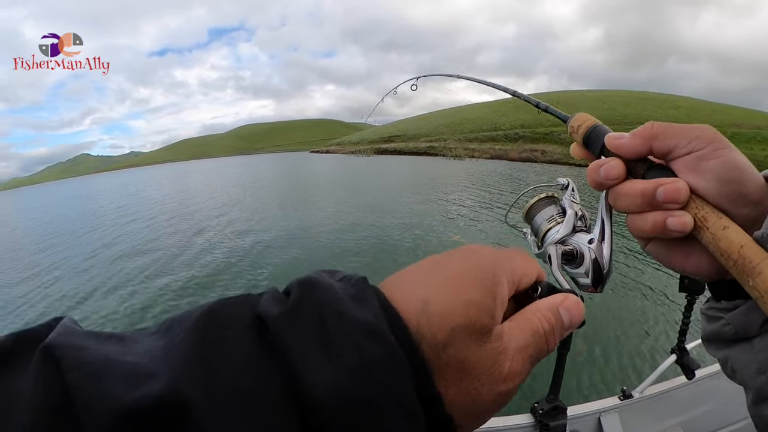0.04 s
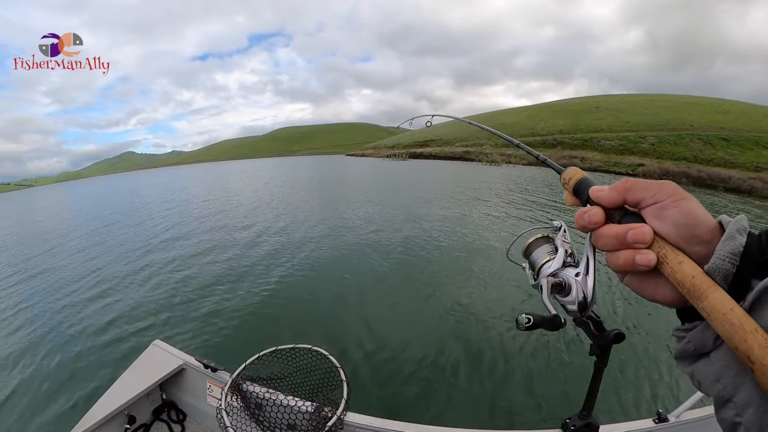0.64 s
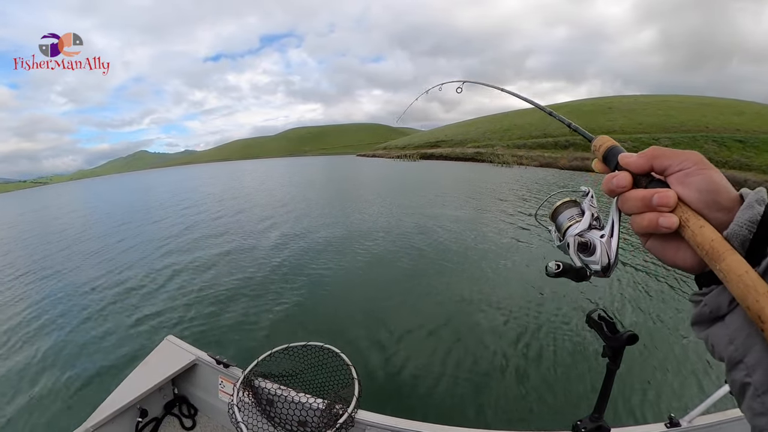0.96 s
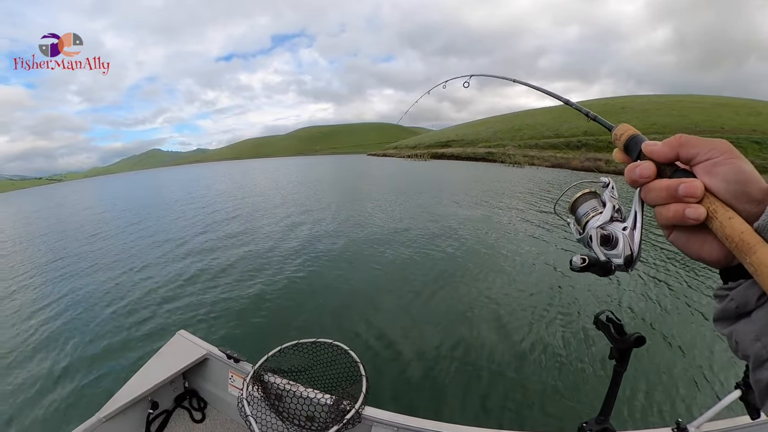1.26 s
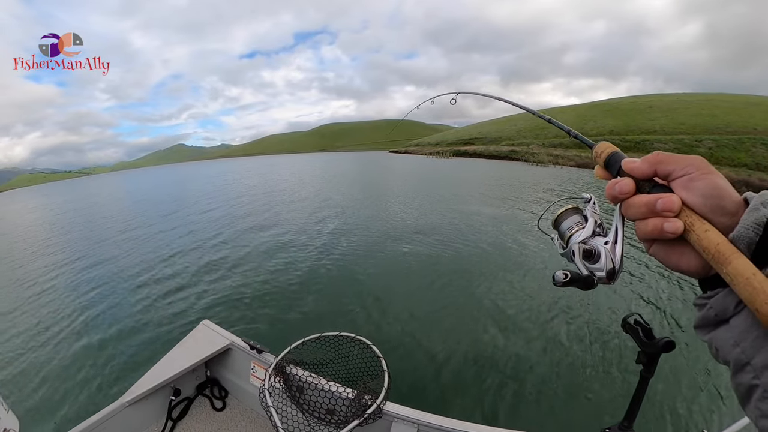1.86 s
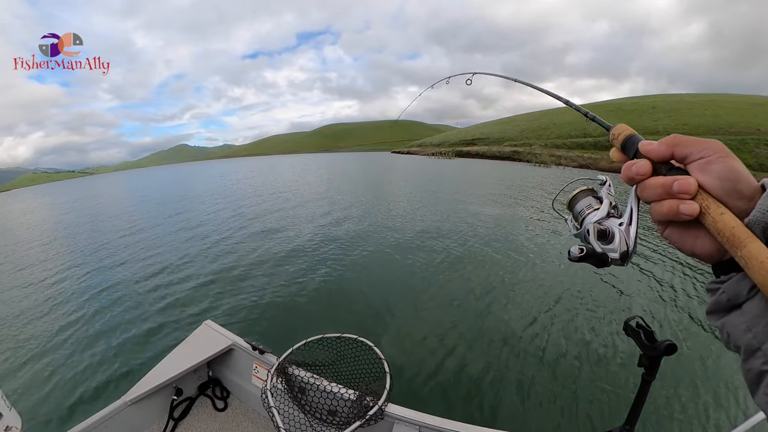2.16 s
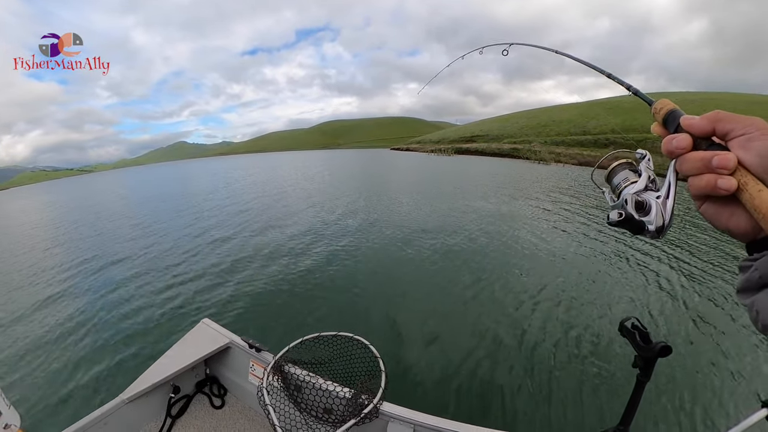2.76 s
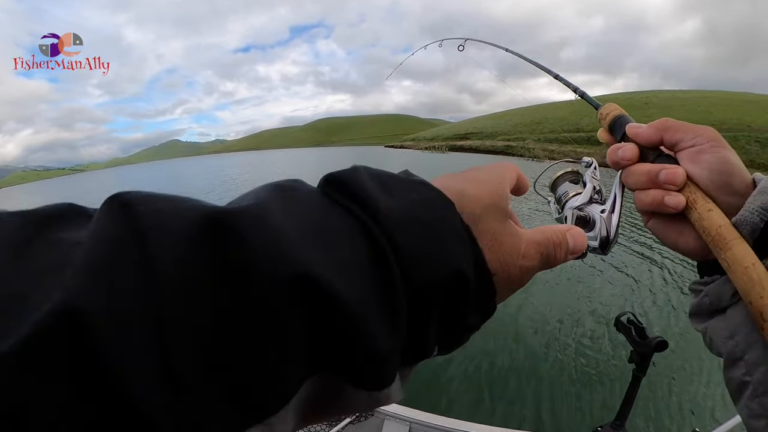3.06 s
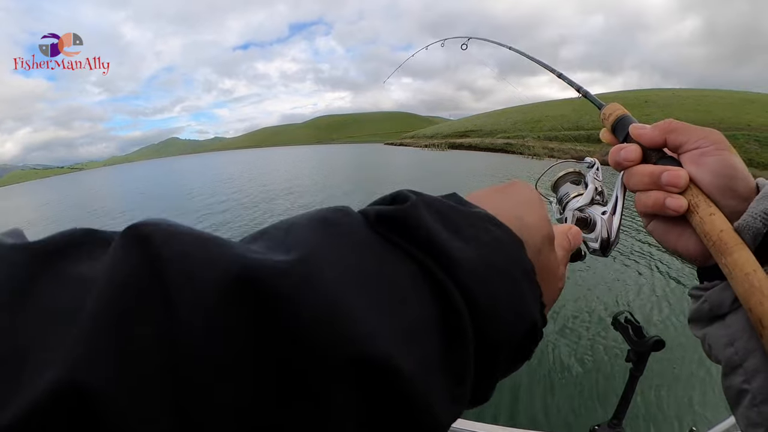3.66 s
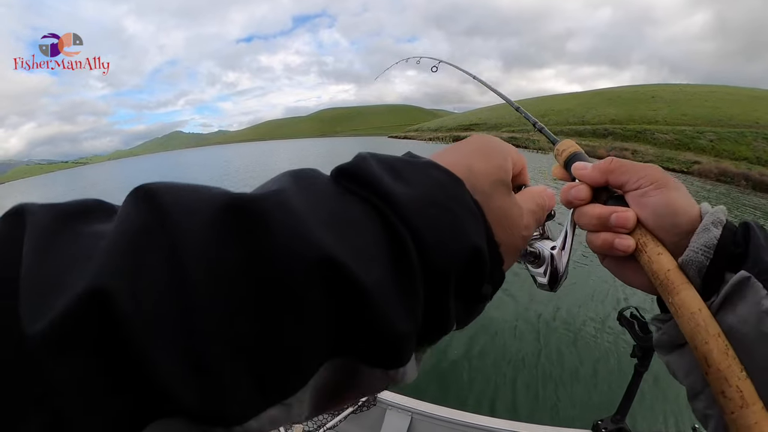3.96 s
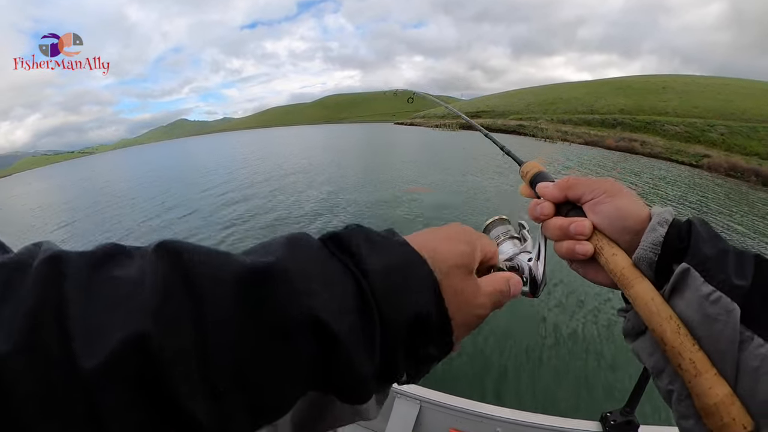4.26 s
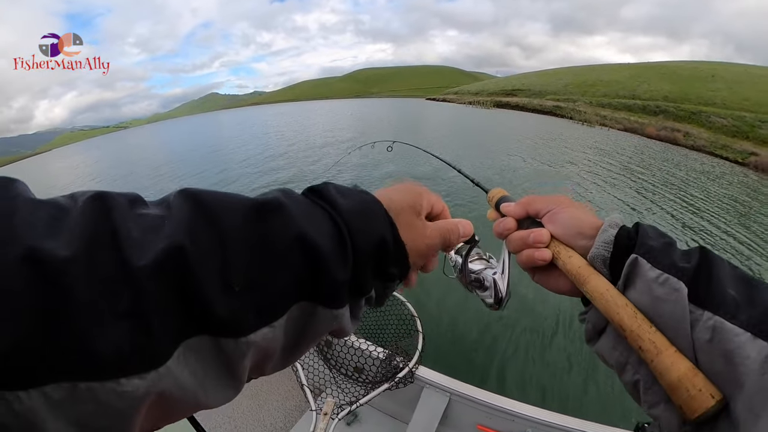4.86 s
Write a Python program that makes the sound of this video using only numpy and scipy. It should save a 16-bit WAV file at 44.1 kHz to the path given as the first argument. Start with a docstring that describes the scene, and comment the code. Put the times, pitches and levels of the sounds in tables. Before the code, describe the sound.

A fishing reel's drag slips close to the microphone in a quick run of bright, ringing metallic clicks that slows by 0.8 seconds. Low wind buffets and dull jacket thumps hit the microphone in the first third of a second and again around 1 second, with soft nylon sleeve rustle. Single, uneven clicks follow from 1.1 to about 2.1 seconds, then it grows quieter. Around 3 seconds come one click, a sleeve swish and a few light knocks of hand and rod. From about 4 to 4.8 seconds the handle is cranked and the gears give a raspy whirr with scattered clicks. At 4.5 seconds the drag breaks into its loudest rapid run, lasting until nearly 5 seconds, with more rustle and small handle ticks. Low wind rumble and faint water against the small boat's hull continue throughout.

```python
"""A spinning reel's drag slips in runs of clicks as an angler plays a fish from a small boat.
A spring snaps off each tooth and rings the spool; later the handle is cranked and the gears whirr
in the reel body while the drag slips again. A nylon sleeve swishes as the arm moves, hand and rod
knock, jacket and wind bump the chest-worn microphone, and water murmurs at the hull."""
import sys
import numpy as np
from scipy import signal
from scipy.fft import rfft, irfft, next_fast_len
from scipy.io import wavfile
from scipy.ndimage import uniform_filter1d, map_coordinates

SR = 44100
rng = np.random.default_rng(int(sys.argv[2]) if len(sys.argv) > 2 else 0)


def unload_wav(signal):
    """Save mono or channel-first audio to the path in sys.argv[1] as 16-bit WAV at rate SR, clipped to [-1, 1]."""
    wavfile.write(
        sys.argv[1],
        SR,
        np.round(np.clip(np.atleast_2d(signal).T, -1, 1) * 32767).astype(np.int16),
    )


N = 221279
TIME_S = np.arange(N) / SR

# Hull and water spectra: (frequency [Hz], level [dB])
HULL_SPECTRUM = [(60, -36), (120, -3.5), (160, 3), (190, -2), (215, -4), (250, -11.5), (330, -18.5),
                 (700, -66), (2000, -120)]
SLOSH_SPECTRUM = [(120, -31), (240, -4.5), (310, 1.5), (400, -4.5), (500, -9.5), (750, -16), (2000, -38),
                  (8000, -48)]
# Angler's weight shifts: (start [s], end [s], level [dB])
WEIGHT_SHIFTS = [(0.852, 1.193, -66.5), (2.29, 2.316, -68), (2.995, 3.075, -62), (3.75, 3.947, -59.5),
                 (4.047, 4.15, -61.5), (4.456, 4.534, -60), (4.837, 5.008, -60)]
# Wind spectra: (frequency [Hz], level [dB])
BUFFET_SPECTRUM = [(10, 4), (25, 3.5), (50, 9.5), (82, 1), (140, -6), (180, -27), (250, -44), (400, -41),
                   (800, -79), (2000, -120)]
RUMBLE_SPECTRUM = [(10, -3.5), (35, 2), (60, -9), (90, -11), (125, -17), (180, -27.5), (260, -43),
                   (500, -96), (1500, -120)]
EDDY_SPECTRUM = [(80, -8), (160, -0.5), (220, -1), (280, -24), (400, -20), (600, -25.5), (1200, -32),
                 (4000, -105)]
# Gusts: (time [s], level [dB], width [s])
GUST_EVENTS = [(.02, -33, 0.15), (0.103, -32, 0.027), (0.161, -27, 0.044), (0.319, -31, 0.054),
               (.485, -38, 0.047), (0.991, -34.5, 0.062), (1.081, -43, 0.02), (1.207, -36, 0.028),
               (1.289, -38.5, 0.018), (1.52, -47, 0.17), (2.0, -44.5, 0.073), (2.259, -44, 0.023),
               (3.56, -49.5, 0.051), (4.099, -42.5, 0.082), (4.24, -47.5, 0.053), (4.892, -46, 0.059)]
# Jacket bumps; knocks of hand, rod and boat: (time [s], level [dB], pitch [Hz])
JACKET_BUMPS = [(0.136, -18.5, 73), (0.1635, -17, 134), (0.296, -29, 62.4), (0.328, -23, 120),
                (0.985, -25, 79), (1.205, -34.5, 107), (4.835, -40, 150), (4.897, -40, 120)]
DULL_KNOCKS = [(.164, -38, 388), (0.239, -34.5, 224), (0.328, -35, 330), (2.256, -46, 300),
               (2.287, -44.5, 340), (3.077, -34, 630), (3.119, -38.5, 275), (3.129, -39.5, 740),
               (3.265, -66, 810), (3.379, -44, 620), (4.726, -35, 400)]
# Handle ticks: (time [s], level [dB])
HANDLE_TICKS = [(2.2565, -58.5), (2.2865, -51), (2.487, -64), (3.076, -40.5), (3.129, -50), (4.839, -42.5),
                (4.9052, -40), (4.969, -47.5)]
# Handle modes: (frequency [Hz], level [dB], t60 [s])
TICK_MODES = [(620, -9, 0.012), (1060, 0, 0.013), (1440, 5.5, 0.009), (1950, 2.5, 0.0099), (2600, 0, .007),
              (3400, -10, 0.018)]
# Arm movements: (start [s], end [s], hiss [dB], rub [dB])
ARM_STROKES = [(0.0, 0.43, -70.5, -66.5), (0.48, 0.61, -66.5, -61), (0.647, 0.801, -62.5, -57.5),
               (.88, 0.966, -75, -69.5), (1.047, 1.406, -82, -76), (1.47, 1.93, -79.5, -75),
               (2.302, 2.76, -99, -78), (2.697, 2.86, -82.5, -83), (2.954, 3.147, -65, -56.5),
               (3.54, 3.746, -78.5, -74), (3.854, 3.937, -70, -66.5), (3.953, 4.015, -64.5, -62.5),
               (4.124, 4.377, -66, -63), (4.42, 4.982, -62.5, -60)]
# Sleeve spectra: (frequency [Hz], level [dB])
HISS_SPECTRUM = [(1200, -23), (2500, -7), (3600, 1), (5500, 1.5), (7300, -3), (8800, -16.5), (10500, -17),
                 (12000, -17), (14000, -29), (16000, -44)]
RUB_SPECTRUM = [(250, -32), (500, -2.5), (800, 0.5), (1900, -5), (2700, -6), (4500, -21.5), (9000, -49)]
# Resonance of the folds: (time [s], pitch [Hz])
HOLLOW_PITCH = [(0, 1740), (.65, 1900), (.78, 1260), (1.5, 1840), (2.85, 1540), (3.1, 980), (3.3, 1420),
                (3.7, 1980), (5.02, 1790)]
# Reel body modes: (frequency [Hz], width [Hz], level [dB])
BODY_MODES = [(798, 46, -5.5), (1005, 12, 1), (1164, 25, -5.5), (1290, 37, -7.5), (1597, 25, 0),
              (1705, 38, 3.5), (1775, 40, -5.5), (1876, 22, 3), (2060, 60, -2), (2230, 16, 2.5),
              (2520, 30, 0), (2940, 46, 3), (3000, 60, 0), (3145, 32, 1), (3300, 90, 1.5), (3430, 80, 3),
              (3500, 36, 1.5), (3930, 150, 1), (4100, 69, 0), (4380, 60, -10), (4810, 180, -1.5)]
# Binding gears, one resonance surging: (time [s], level [dB], pitch [Hz], width [s])
GEAR_SURGES = [(3.958, -57, 3440, 0.0098), (4.07, -55.5, 1724, 0.035), (4.175, -52.5, 1700, 0.02),
               (4.17, -58, 1790, 0.016), (4.16, -55.5, 2236, 0.022), (4.22, -61, 1012, 0.021),
               (4.255, -54, 2236, 0.03), (4.304, -45, 1712, 0.0082), (4.41, -60, 3110, 0.055),
               (4.455, -57.5, 1011, 0.023), (4.525, -49, 1930, 0.0067), (4.755, -53.5, 2965, 0.02)]
# Free spool's resonances: (frequency [Hz], width [Hz], level [dB])
SONG_BANDS = [(2600, 220, 2), (12140, 500, -2.5)]
# Spool and rim modes: (frequency [Hz], level [dB], t60 [s])
SPOOL_RING = [(2550, -22, 0.04), (4100, 0, 0.072), (8280, -29, 0.35)]
RIM_RING = [(7020, -12, 0.057), (9610, -15.5, 0.035), (11480, -6.5, 0.018), (11760, -5, .017),
            (12020, -4, 0.03), (12470, -3, .01)]
# Clicker spring modes: (frequency ratio [1], level [dB], t60 [s])
SPRING_PING = [(1, 2, 0.016), (.985, -12, .04), (1.026, -14, 0.04), (.95, -5, 0.007)]
SPRING_SNAP = [(1, 0, 0.0085), (0.94, -2.5, 0.0076), (1.09, -9.5, 0.0085)]
# Click noise spectra: (frequency [Hz], gain [dB])
CRACK_SPECTRUM = [(500, -2), (1600, -2.5), (2600, -3), (3500, 4.5), (5500, 7.5), (7400, 8.5), (8600, -7),
                  (13000, -8), (16000, -17)]
SIZZLE_SPECTRUM = [(8500, -26), (9500, 0), (10600, 1.5), (11700, 4), (13100, 6), (14000, 0), (16000, -20)]
# One-tooth slips: (time [s], snap [dB], spool [dB], ping [dB], rim [dB], ping [Hz], snap [Hz])
DRAG_CLICKS = [(0.084, -48.5, -56, -55.5, -52.5, 5670, 6700),
               (0.151, -46.5, -47.5, -51.5, -54.5, 5640.0, 6700),
               (0.189, -46.5, -45, -45, -53, 5930, 6550.0), (0.216, -45, -44.5, -44, -53.5, 5600, 6600),
               (0.2397, -44, -50, -47, -53.0, 5400, 6600), (0.2607, -46, -45.5, -54.5, -52, 5520.0, 6600),
               (0.28, -56, -45, -50, -54.0, 5370, 6750.0), (0.298, -56.0, -50, -40.5, -56.5, 5340, 6550.0),
               (0.3176, -49.0, -49, -46.5, -57.5, 5460.0, 6500),
               (0.3396, -47.5, -52, -48.5, -55.0, 5390.0, 6870.0),
               (0.3632, -43.5, -60, -45, -57, 5470.0, 6700.0), (0.3889, -42, -44, -51, -58.0, 5760.0, 6540),
               (0.42, -44, -49, -54.0, -52.0, 5670.0, 6300), (0.4525, -45.0, -51, -46, -55.0, 5660, 6800),
               (0.492, -47, -48.5, -43.5, -57, 5360, 7200), (0.536, -51, -44.5, -49, -56.5, 5400.0, 6650),
               (0.5992, -57, -48.5, -43, -59, 5400, 6900), (0.6786, -51, -52, -52, -59.0, 5370.0, 7140.0),
               (0.793, -54, -65.0, -57, -63, 5670, 7200), (1.1451, -48, -55, -49, -54.5, 5460.0, 6800),
               (1.3673, -45.5, -55, -58, -52.5, 5530.0, 6600.0),
               (1.4714, -45, -61, -61.0, -52, 5630.0, 6870),
               (1.549, -43.5, -54.5, -53.0, -49.5, 5450, 6700),
               (1.6303, -46, -66.5, -55.0, -52, 5450, 6760), (1.7181, -45, -54, -46, -54, 5420.0, 6500),
               (1.783, -55.5, -79.5, -60.0, -79, 5300, 6530.0),
               (1.8461, -43.5, -52, -43.5, -54.0, 5380, 6270), (2.0882, -49, -57, -49, -54.5, 5350, 6550.0),
               (2.1758, -77, -87.5, -65, -62.5, 5770, 6420.0),
               (2.967, -56.0, -62.0, -50.5, -55.5, 5300, 6390.0),
               (3.9363, -47, -47.5, -49, -46.5, 5570, 6250), (4.05, -37, -54, -35.5, -52.5, 5530.0, 6230),
               (4.1515, -49, -50, -47.5, -93.5, 5450.0, 6970.0),
               (4.2503, -33, -57.0, -33.5, -54.0, 5480, 6750),
               (4.3512, -33, -53.0, -38.5, -58.5, 5530, 6400), (4.5198, -35.5, -45, -34.5, -47, 5530, 7100),
               (4.5571, -34.5, -39.5, -37.5, -50, 5440.0, 7210.0),
               (4.5885, -40, -39, -32.5, -49.0, 5460, 7320.0),
               (4.6165, -34.5, -43, -30.5, -54.0, 5400.0, 7310.0),
               (4.6412, -32.5, -58.0, -35, -56, 5410.0, 7130.0),
               (4.6622, -28.5, -39.5, -36, -51, 5440, 7040), (4.683, -33, -52, -41, -51, 5630.0, 7130.0),
               (4.7038, -32, -41.5, -32.5, -47, 5470, 7100), (4.7243, -31, -45, -30, -50, 5460, 7000),
               (4.748, -33, -42, -32.5, -51, 5530, 6910.0), (4.7721, -41, -39, -33.5, -58.0, 5400, 6700),
               (4.795, -36, -48, -37.5, -51, 5670, 7300), (4.8156, -38.5, -56.5, -39.0, -55.5, 5600, 6570),
               (4.8351, -32.5, -72.0, -40, -57, 5500, 6700), (4.8558, -30, -45.5, -38, -54, 5600, 6500),
               (4.8823, -30.5, -45, -34.5, -57, 5770.0, 6760), (4.9448, -32, -55, -32, -56, 5540, 6650)]
# Stereo side spectrum: (frequency [Hz], gain [dB])
SIDE_SPECTRUM = [(30, -12), (110, -21), (250, -29.5), (1000, -27), (2400, -27.5), (4400, -29), (8000, -18),
                 (14000, -14)]
# Stereo widening: (time [s], side gain [dB])
SIDE_GAIN = [(0, -57), (3.3, -36), (3.9, 14.5), (4.3, -1), (4.65, 6.5), (5.02, 13.5)]


def amp(db):
    return 10 ** (np.asarray(db) / 20)


def unit(x):
    return x / np.sqrt(np.mean(x ** 2) + 1e-20)


def gain_at(spectrum, hz):
    """Linear gain; dB interpolated over log frequency."""
    knots_hz, db = np.transpose(spectrum)
    return amp(np.interp(np.log(hz + 1), np.log(knots_hz + 1), db))


def curve(points):
    """(time, value) points, interpolated per sample."""
    return np.interp(TIME_S, *np.transpose(points))


def phase_rad(hz):
    return 2 * np.pi * np.cumsum(hz) / SR


def wobble(rate_hz):
    """Smooth random curve through knots at rate_hz."""
    knots = rng.standard_normal(int(N * rate_hz / SR) + 4)
    return map_coordinates(knots, [np.arange(N) * rate_hz / SR])


def swell_db(start_s, end_s, rise_db_per_s, fall_db_per_s):
    """Rise, hold at 0 dB from start to end, fall."""
    before_s, after_s = np.maximum(start_s - TIME_S, 0), np.maximum(TIME_S - end_s, 0)
    return -rise_db_per_s * before_s - fall_db_per_s * after_s


def filtered(x, response):
    """Apply a complex frequency response."""
    size = next_fast_len(N + SR // 2)
    return irfft(rfft(x, size) * response(np.fft.rfftfreq(size, 1 / SR)), size)[..., :N]


def shaped(x, spectrum):
    return filtered(x, lambda hz: gain_at(spectrum, hz))


def noise(spectrum):
    return unit(shaped(rng.standard_normal(N), spectrum))


def resonance(hz, centre_hz, width_hz):
    """Response of one damped mode."""
    return 1j * hz * width_hz / (centre_hz ** 2 - hz ** 2 + 1j * hz * width_hz)


def noise_band(centre_hz, width_hz):
    return unit(filtered(rng.standard_normal(N), lambda hz: resonance(hz, centre_hz, width_hz) ** 2))


def friction(slips_per_s, grain_db):
    """Sliding noise with tiny uneven slips."""
    slips = (rng.random(N) < slips_per_s / SR) * rng.standard_normal(N)
    return unit(rng.standard_normal(N) + amp(grain_db) * unit(slips))


def steadied(x, window_s):
    """Even out slow swells."""
    return x / np.sqrt(np.abs(uniform_filter1d(x ** 2, int(window_s * SR))) + 0.0019)


def ringing(modes, t, scatter_db):
    """Damped modes, varied per strike; the most damped detune most."""
    hz, db, t60_s = np.transpose(modes)[:, :, None]
    size, detune, phase = rng.standard_normal((3, len(hz), 1))
    envelope = amp(db + scatter_db * size - 60 * t / t60_s)
    return (envelope * np.sin(2 * np.pi * ((hz + .8 * detune / t60_s) * t + phase))).sum(0)


def add(track, time_s, sound):
    start = max(round(time_s * SR), 0)
    track[start:start + len(sound)] += sound[:max(N - start, 0)]


def water(boom_db=-62, lapping_db=-69, rise_db_per_s=79, fall_db_per_s=67):
    """Water laps, and sloshes as the angler shifts; the hull booms softly with it."""
    rocking = np.sqrt(sum(amp(db + swell_db(start_s, end_s, rise_db_per_s, fall_db_per_s)) ** 2
                          for start_s, end_s, db in WEIGHT_SHIFTS))
    hull = np.hypot(amp(boom_db), rocking) * amp(wobble(8.3)) * noise(HULL_SPECTRUM)
    slosh = np.hypot(amp(lapping_db), rocking) * amp(1.5 * wobble(18)) * noise(SLOSH_SPECTRUM)
    return hull + slosh


def wind(breeze_db=-48, slacken_db_per_s=1.3, onset_db=-42, eddy_db=-30.5, eddy_growth=2.14):
    """Breeze rumbles at the microphone; faster air buffets it and sheds small eddies."""
    breeze = amp(breeze_db - slacken_db_per_s * TIME_S + 1.5 * wobble(21.1))
    gust_power = sum(amp(db) ** 2 * np.exp(-((TIME_S - time_s) / width_s) ** 2)
                     for time_s, db, width_s in GUST_EVENTS)
    level_db = 10 * np.log10(breeze ** 2 + gust_power)
    buffet_share = 1 / (1 + amp(2 * (onset_db - level_db)))
    buffet = np.sqrt(buffet_share) * steadied(noise(BUFFET_SPECTRUM), window_s=0.073)
    rumble = np.sqrt(1 - buffet_share) * amp(-1) * steadied(noise(RUMBLE_SPECTRUM), window_s=0.11)
    eddies = amp(onset_db + eddy_db + eddy_growth * (level_db - onset_db)) * noise(EDDY_SPECTRUM)
    return eddies + amp(level_db) * (buffet + rumble)


def handling(bump_t60_cycles=6, knock_t60_cycles=15, knock_db=-5, thud_db=-4, tick_db=-3):
    """Jacket bumps the microphone, rod and boat knock, play in the handle ticks."""
    track, t = np.zeros(N), np.arange(SR // 8) / SR
    for time_s, db, hz in JACKET_BUMPS:
        envelope = amp(db - 60 * t * hz / bump_t60_cycles) * (1 - np.exp(-2 * np.pi * hz * t))
        add(track, time_s, envelope * np.sin(2 * np.pi * hz * t))
    for time_s, db, hz in DULL_KNOCKS:
        ring = np.sin(2 * np.pi * hz * t) + .5 * np.sin(2 * np.pi * (1.22 * hz * t + rng.random()))
        thud = unit(signal.lfilter(*signal.iirpeak(hz, 1, SR), rng.standard_normal(len(t))))
        thud = signal.lfilter(*signal.butter(4, 1.38 * hz, fs=SR), thud)
        envelope = amp(db + knock_db - 60 * t * hz / knock_t60_cycles) * (1 - np.exp(-t / 0.0003))
        add(track, time_s, envelope * (ring + amp(thud_db) * thud))
    tick_attack = 1 - np.exp(-(t / 0.00051) ** 2)
    for time_s, db in HANDLE_TICKS:
        add(track, time_s, amp(db + tick_db) * tick_attack * ringing(TICK_MODES, t, scatter_db=3.5))
    return track


def arm(still_db=-88):
    """Hiss and rub gains: each movement swells, holds and dies away."""
    hiss_power = rub_power = amp(still_db) ** 2
    for start_s, end_s, hiss_db, rub_db in ARM_STROKES:
        motion_db = swell_db(start_s, end_s, rise_db_per_s=138, fall_db_per_s=111)
        hiss_power = hiss_power + amp(hiss_db + motion_db) ** 2
        rub_power = rub_power + amp(rub_db + motion_db) ** 2
    return np.sqrt(hiss_power), np.sqrt(rub_power)


def sleeve(hollow_octaves=0.36):
    """Sliding nylon hisses; the hollow of the folds colours the rub."""
    hiss_gain, rub_gain = arm()
    pitch_hz = curve(HOLLOW_PITCH)
    hollow = np.zeros(N)
    for hz in np.geomspace(800, 1900, num=4):
        share = np.exp(-(np.log2(pitch_hz / hz) / hollow_octaves) ** 2)
        hollow += share * noise_band(hz, width_hz=.5 * hz)
    cloth = unit(shaped(friction(slips_per_s=430, grain_db=-5.5), RUB_SPECTRUM))
    rub = unit(cloth + unit(hollow))
    hiss = unit(shaped(friction(slips_per_s=1500, grain_db=-5), HISS_SPECTRUM))
    creases = amp(.9 * wobble(45))
    return creases * (amp(3) * hiss_gain * hiss + rub_gain * rub)


def taut_fold(start_s=.66, end_s=.775, from_hz=1700, to_hz=1188, level_db=-66):
    """A fold slides past the chest; its narrow swish falls in pitch as the arm slows."""
    phase = phase_rad(curve([(start_s, from_hz), (end_s, to_hz)]))
    band = wobble(600) * np.cos(phase) + wobble(600) * np.sin(phase)
    return amp(level_db + swell_db(start_s, end_s, rise_db_per_s=222, fall_db_per_s=222)) * unit(band)


def reel_body(scrape, sway_db=2.5):
    """The hollow body resonates, in a low and a high band; the rotor shifts load between modes."""
    _, _, frames = signal.stft(scrape, SR, nperseg=2048)
    load = uniform_filter1d(rng.standard_normal(frames.shape), size=7, axis=0)
    load = unit(uniform_filter1d(load, size=3, axis=1))
    swayed = signal.istft(frames * amp(sway_db * load), nperseg=2048)[1][:N]
    grid_hz = np.fft.rfftfreq(next_fast_len(SR // 4), 1 / SR)
    shell = np.sqrt(sum(np.abs(amp(db) * resonance(grid_hz, hz, width_hz)) ** 2
                        for hz, width_hz, db in BODY_MODES))

    def band(hz_db):
        return unit(filtered(swayed, lambda hz: np.interp(hz, grid_hz, shell) * gain_at(hz_db, hz)))

    low = band(hz_db=[(300, 1), (700, -1.5), (1200, -3), (2400, -7), (2900, -29)])
    high = band(hz_db=[(2300, -24), (2800, 1), (5000, -3), (9000, -37)])
    return low, high


def gears(start_s=3.95, end_s=4.79, hardest_pull_s=4.222, fade_s=0.015, shaft_hz=37.5, mesh_hz=190):
    """Gear teeth and line roller scrape under load; uneven catching makes the whirr rasp."""
    low, high = reel_body(friction(slips_per_s=1100, grain_db=-2.5))
    turning = np.clip(np.minimum(TIME_S - start_s, end_s - TIME_S) / fade_s + 1, 0, 1)
    load_db = -50 + swell_db(hardest_pull_s, hardest_pull_s, rise_db_per_s=30, fall_db_per_s=12.5)
    rotor_db = -54.5 + 3 * (TIME_S - start_s)  # louder as the rotor gathers speed
    travel = phase_rad(1 + .02 * wobble(6))
    catch_db = 0.5 * np.cos(shaft_hz * travel) + 0.7 * np.cos(mesh_hz * travel) + 0.93 * wobble(170)
    whirr = turning * amp(catch_db) * (amp(load_db) * low + amp(rotor_db) * high)
    for time_s, db, hz, width_s in GEAR_SURGES:
        tone = np.sqrt(2) * np.sin(phase_rad(hz + 15 * wobble(150)))
        whirr += amp(db + catch_db) * np.exp(-((TIME_S - time_s) / width_s) ** 2) * tone
    return whirr


def spool(hum_hz=1720, waver_hz=5.4):
    """Line sliding off the spinning spool keeps the rim singing; the body hums one faint tone."""
    song = sum(amp(db) * noise_band(hz, width_hz) for hz, width_hz, db in SONG_BANDS)
    song_db = -75 + swell_db(start_s=0.26, end_s=0.39, rise_db_per_s=82, fall_db_per_s=47)
    hum = np.sqrt(2) * np.sin(phase_rad(hum_hz + waver_hz * wobble(60)))
    hum_db = -73 + swell_db(start_s=0.2, end_s=0.33, rise_db_per_s=90, fall_db_per_s=90)
    return amp(hum_db) * hum + amp(song_db) * song


def drag(rise_s=0.00069, crack_t60_s=0.0069, sizzle_t60_s=0.015, chatter_t60_s=0.11, coast_s=(.33, .7)):
    """The clicker spring drops off each tooth of the slipping spool, then chatters on the next."""
    rings, cracks, sizzles = np.zeros((3, N))
    t = np.arange(SR // 5) / SR
    attack = 1 - np.exp(-(t / rise_s) ** 2)  # rounded tooth: the blow builds
    for time_s, snap_db, spool_db, ping_db, rim_db, ping_hz, snap_hz in DRAG_CLICKS:
        rim_t60_scale = 1.5 if coast_s[0] < time_s < coast_s[1] else 1
        ring = amp(spool_db) * ringing(SPOOL_RING, t, scatter_db=-1)
        # spring pitch depends on its bend
        ring += amp(ping_db) * ringing(np.multiply(SPRING_PING, [ping_hz, 1, 1]), t, scatter_db=1)
        ring += amp(snap_db) * ringing(np.multiply(SPRING_SNAP, [snap_hz, 1, 1]), t, scatter_db=-1)
        ring += amp(rim_db) * ringing(np.multiply(RIM_RING, [1, 1, rim_t60_scale]), t, scatter_db=3.5)
        chatter = amp(rim_db - 11 - 60 * t / chatter_t60_s)
        crack = amp(snap_db - 60 * t / crack_t60_s) + chatter
        sizzle = amp(rim_db - 60 * t / sizzle_t60_s) + 0.42 * chatter
        add(rings, time_s, attack * ring)
        add(cracks, time_s, attack * crack * rng.standard_normal(len(t)))
        add(sizzles, time_s, attack * sizzle * rng.standard_normal(len(t)))
    return rings + shaped(cracks, CRACK_SPECTRUM) + shaped(sizzles, SIZZLE_SPECTRUM)


def scene(scatter_t60_s=0.0023):
    """Close, central sources; shifting reflections off arms and rod make the sides differ."""
    mid = drag() + spool() + gears() + sleeve() + taut_fold() + handling() + wind() + water()
    t = np.arange(SR // 50) / SR
    scatter = rng.standard_normal(len(t)) * amp(-60 * t / scatter_t60_s)
    reflections = signal.fftconvolve(mid, scatter / np.linalg.norm(scatter))[:N]
    shifting = unit(np.sin(2 * wobble(47)))
    side = amp(curve(SIDE_GAIN)) * shaped(shifting * reflections, SIDE_SPECTRUM)
    return np.array([mid + side, mid - side])


def record(dry, cutoff_hz=15900):
    """Brick-wall low-pass."""
    return filtered(dry, lambda hz: hz < cutoff_hz)


dry = scene()
out = record(dry)
unload_wav(out)
```